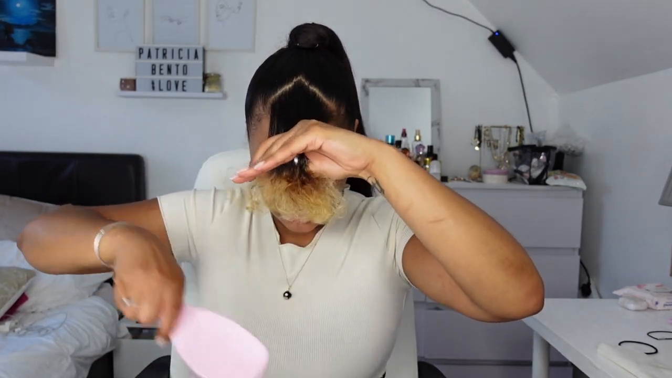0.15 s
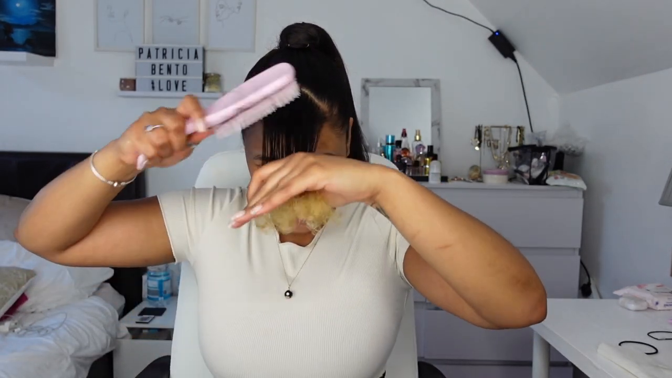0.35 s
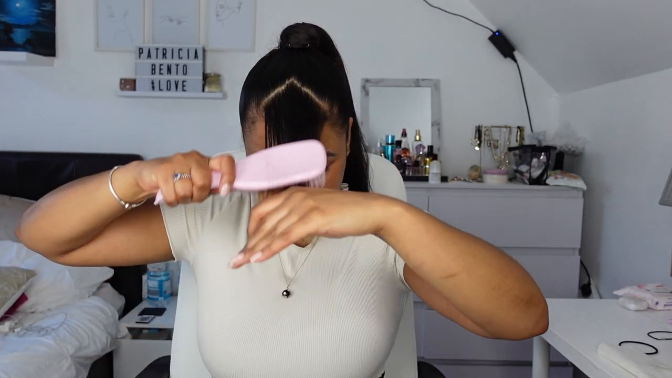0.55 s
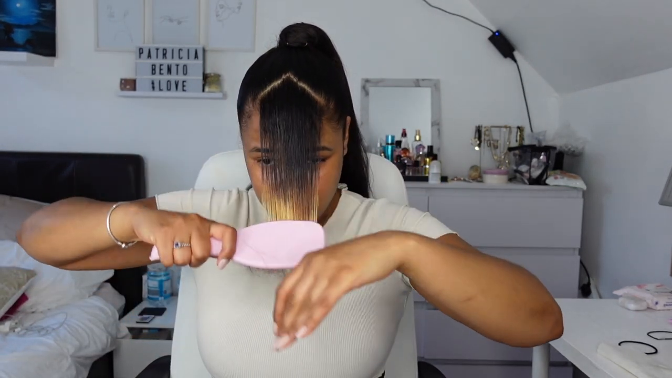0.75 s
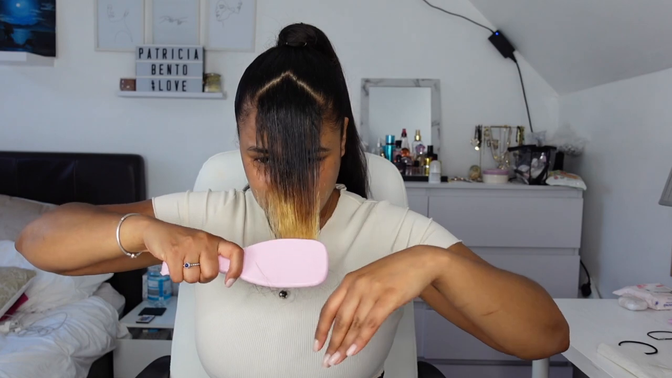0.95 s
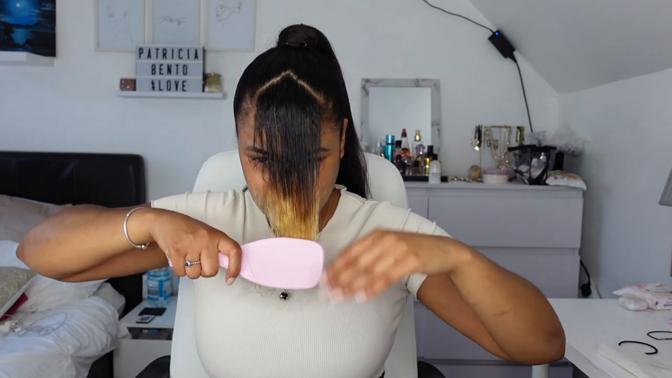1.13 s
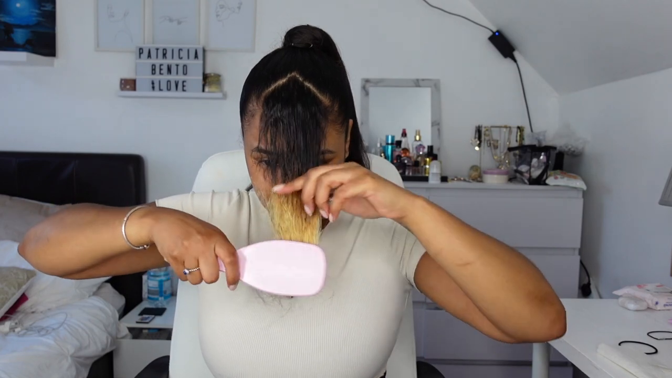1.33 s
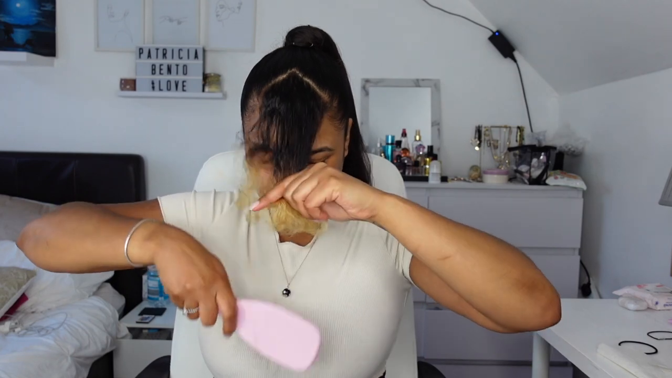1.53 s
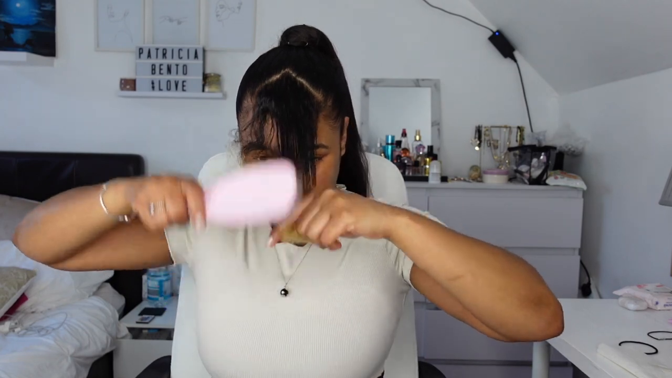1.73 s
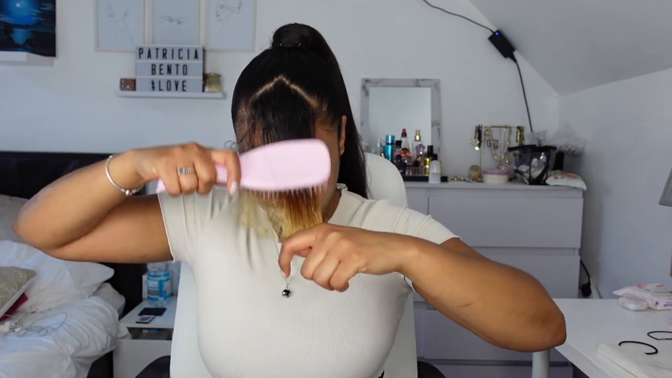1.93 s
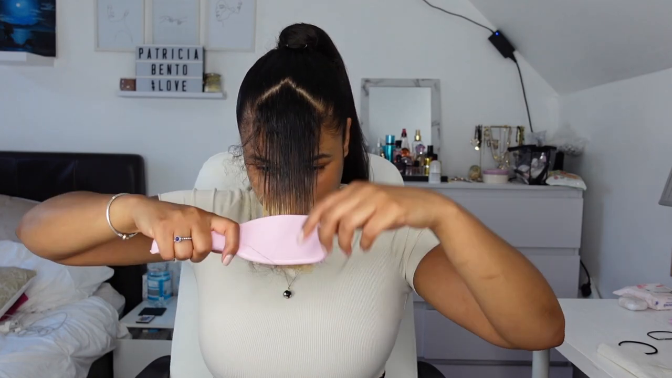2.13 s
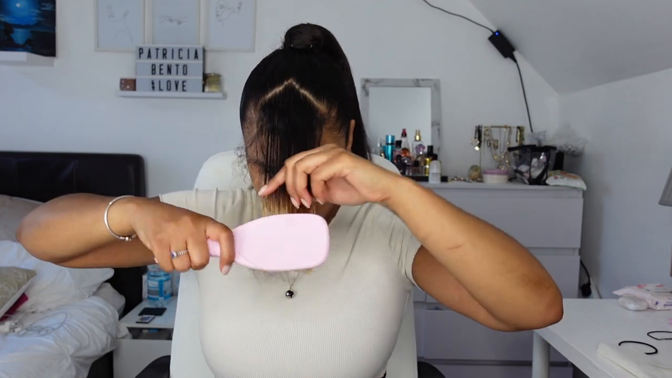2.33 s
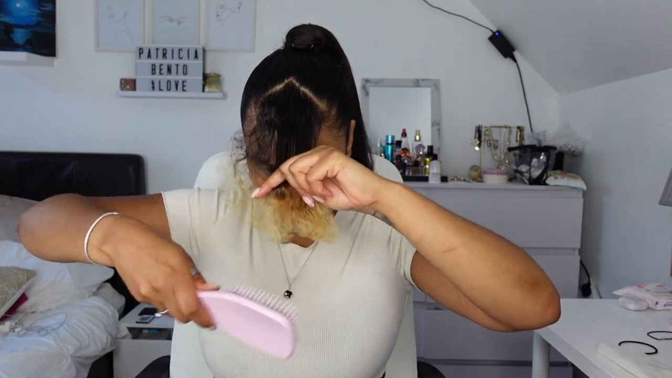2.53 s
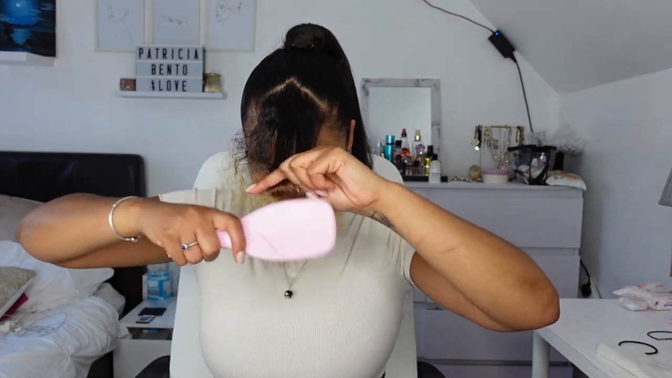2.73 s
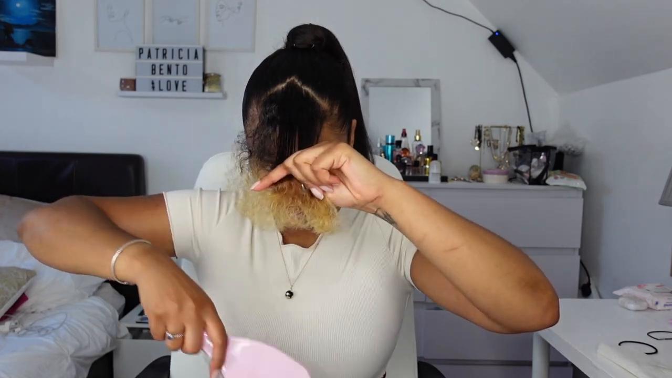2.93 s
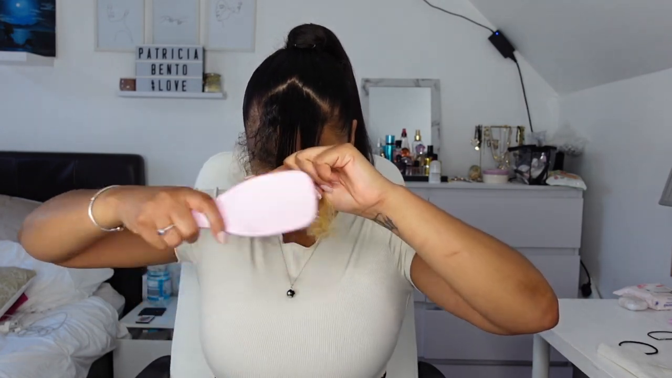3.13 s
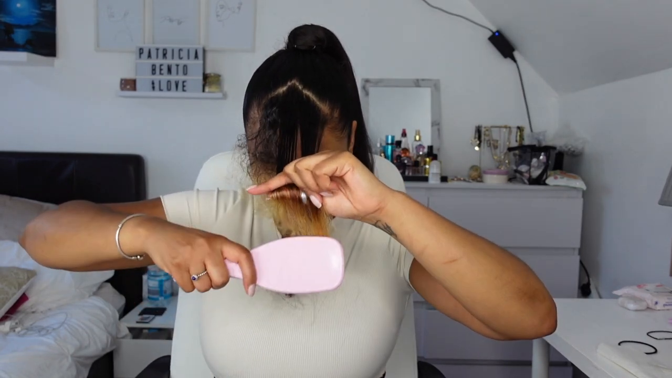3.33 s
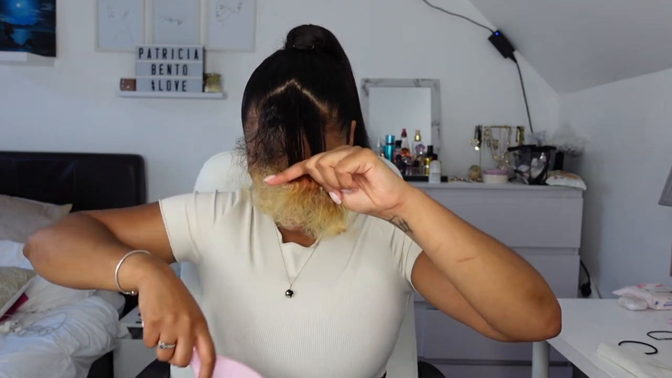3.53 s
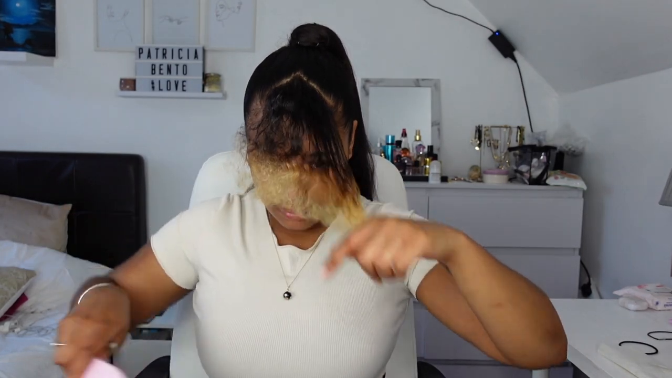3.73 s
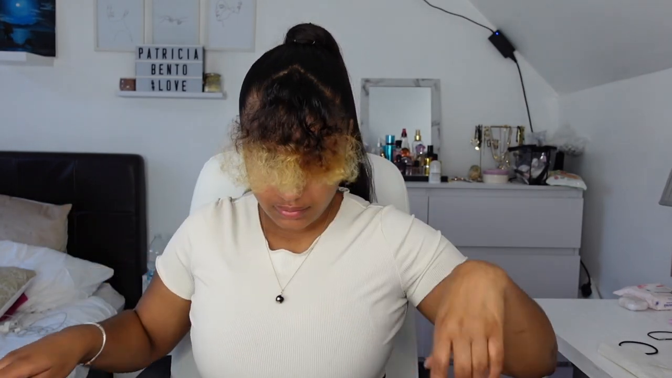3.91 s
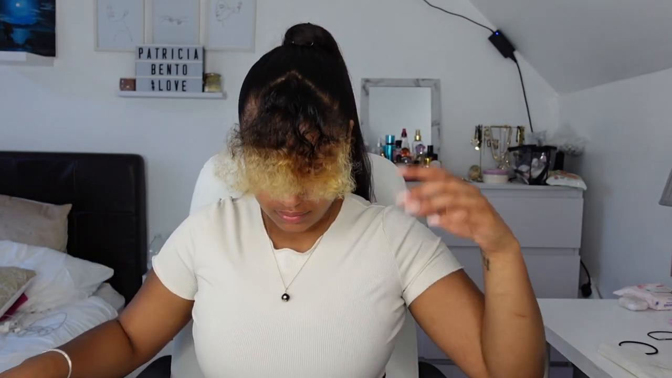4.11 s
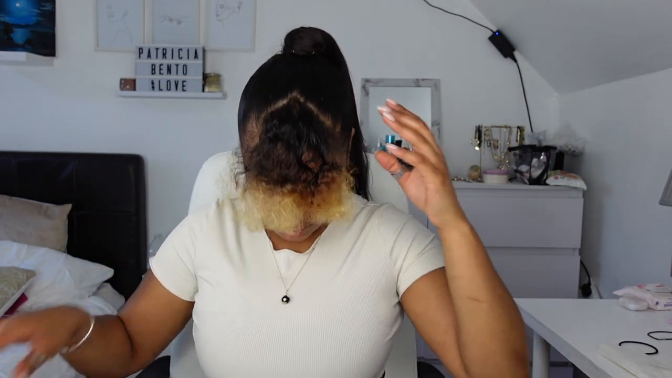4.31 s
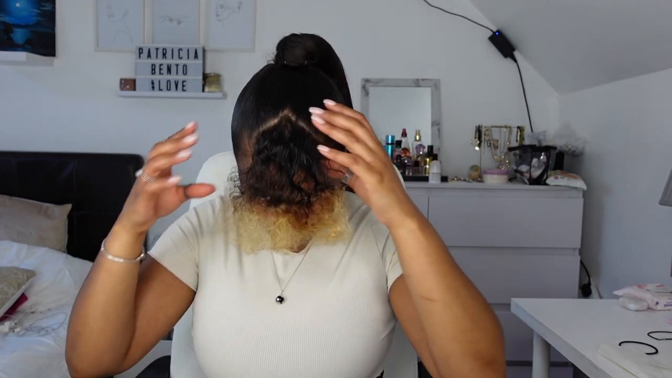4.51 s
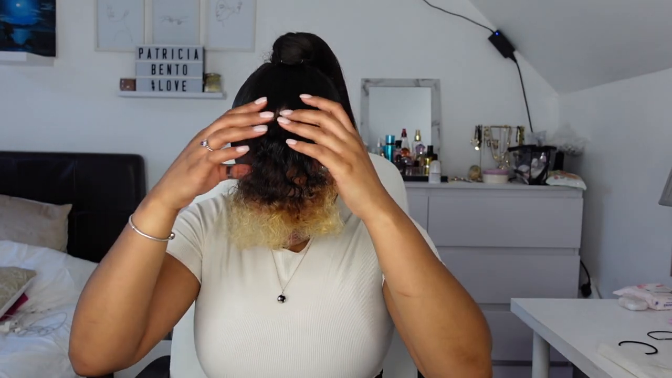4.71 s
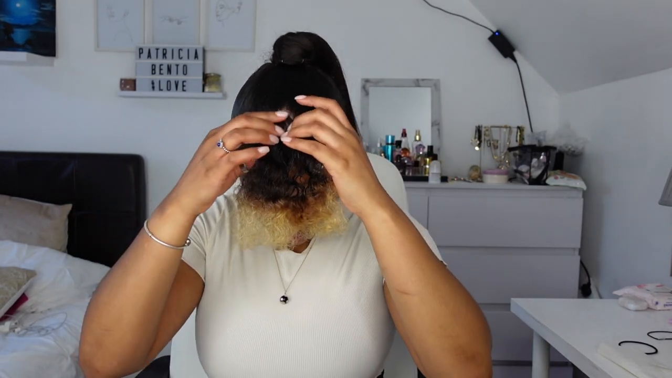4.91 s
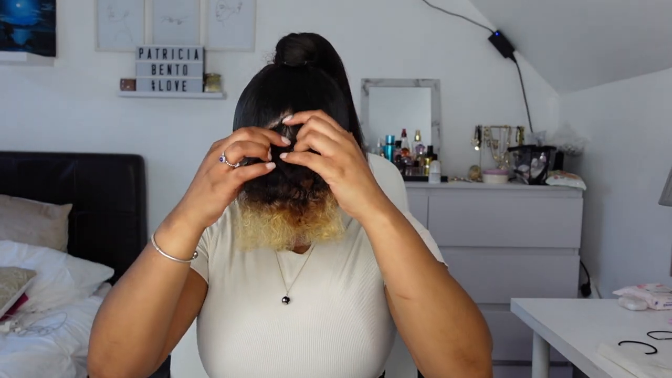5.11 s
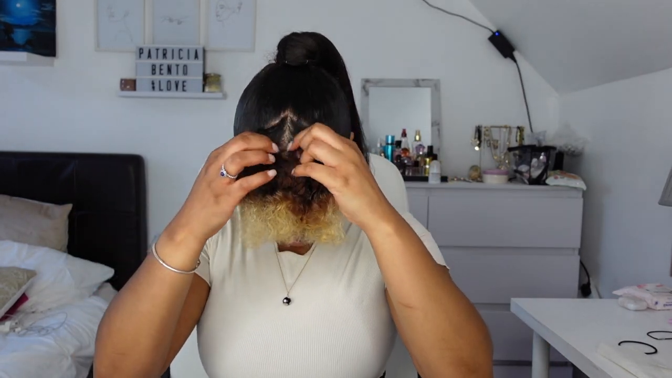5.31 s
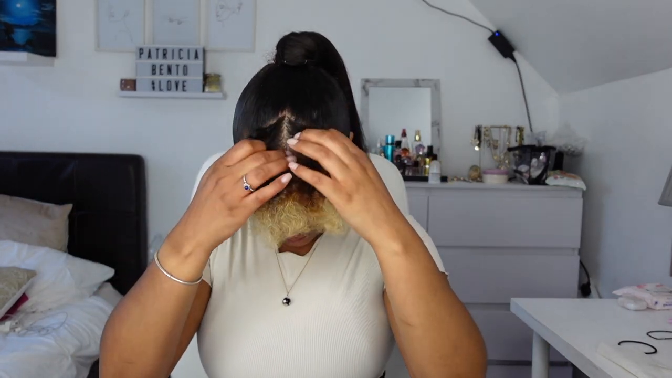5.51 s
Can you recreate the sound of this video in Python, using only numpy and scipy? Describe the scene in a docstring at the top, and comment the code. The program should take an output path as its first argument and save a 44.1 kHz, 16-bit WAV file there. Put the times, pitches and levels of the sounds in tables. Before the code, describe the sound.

Hair rustles and hisses close by as a hollow plastic brush passes through it a few times, its bristles ticking as they catch and release. Then comes the loudest sound, a quick cluster of wooden bumps and a scrape as the brush lands on a desk. A barely audible rustle of hair follows. The small room is quiet, with a soft background murmur and a few thin, distant bird whistles.

```python
"""A plastic paddle brush is pulled through hair in a quiet bedroom, then laid on a wooden desk.
Slipping strands make a soft rasp and hiss, and snagged bristles snap free and ring the hollow paddle.
Then the brush bumps, rattles and slides on the desk, making the wood ring. Small birds whistle
faintly outside, the house murmurs, a low drone comes and goes, and the room adds a short echo."""
import sys
import numpy as np
from scipy import signal
from scipy.fft import rfft, irfft
from scipy.io import wavfile
from scipy.ndimage import uniform_filter1d

SR = 44100
rng = np.random.default_rng(int(sys.argv[2]) if len(sys.argv) > 2 else 0)


def log_audio(samples):
    """Write samples as a 16-bit WAV file to the path given in sys.argv[1]."""
    # one column per channel
    frames = np.atleast_2d(samples).T
    # limit to full scale, then quantise
    limited = np.clip(frames, -1, 1)
    pcm = np.round(limited * 32767).astype(np.int16)
    wavfile.write(sys.argv[1], SR, pcm)


N = 245195

# Swells of hair rustle: brush pulls, then a faint stir of fingers in the hair.
# Each row: loudest moment, swell time and fade time in seconds, then rasp level and hiss level in dB.
HAIR_SWELLS = [(0.0, .01, 0.078, -40.5, -49), (0.15, 0.26, 0.35, -59, -75), (0.49, 0.065, 0.38, -61, -68.5),
               (0.69, 0.39, .1, -67.5, -69.5), (0.75, 0.076, 0.17, -50, -55),
               (0.86, 0.18, 0.15, -58, -61.5), (0.94, .02, 0.04, -54.5, -59), (0.97, .02, 0.18, -61, -64.5),
               (1.48, 0.13, 0.19, -67, -75), (1.93, 0.038, 0.36, -61.5, -69.5),
               (2.13, 0.63, 0.28, -63, -70), (2.475, 0.091, 0.16, -63.5, -71.5),
               (2.757, 0.011, 0.045, -63, -51), (2.8, 0.035, 0.16, -56, -61.5),
               (3.22, 0.073, 0.028, -59, -69), (3.255, 0.015, 0.014, -42, -49),
               (3.27, .02, .15, -54.5, -58), (3.447, 0.025, 0.065, -51, -56),
               (3.56, 0.19, 0.35, -69, -73.5), (4.85, 0.52, 0.45, -69, -75.5)]
# The tone of slipping hair. Each row: frequency in Hz, level in dB.
HAIR_TONE = [(180, -57), (300, -13.5), (461, -0.5), (581, -4.5), (808, 5), (1160, 0), (1620, -3),
             (1940, -7.5), (2930, -15.5), (15500, -47)]
# The notes the hollow paddle rings at. Each row: pitch in Hz, width in Hz, level in dB.
PADDLE_NOTES = [(852, 280, -1.5), (1190, 236, -18), (1660, 290, 5.5), (2146, 160, 16.5), (2620, 53, -14),
                (3107, 450, 6), (4030, 170, -15), (5570, 55, -18)]
# Bristles snapping free. Each row: start in seconds, level in dB, pitch in Hz, relative crack level in dB.
BRISTLE_SNAPS = [(0.001, -30.5, 870, -7), (0.715, -44, 865, -21), (0.734, -34.5, 1650, -29),
                 (0.744, -33.5, 980, -35), (0.756, -38.5, 1430, -26), (0.778, -36, 1580, -29),
                 (0.816, -42, 1650, -16), (0.845, -42, 2340, -27), (0.871, -42.5, 940, -27),
                 (0.935, -42.5, 1330, -25), (0.967, -44, 1560, -28), (1.914, -47.5, 785, -26),
                 (1.953, -52, 845, -23), (2.179, -49.5, 2160, -14), (2.753, -40, 1630, -6),
                 (2.763, -50, 1760, -25), (2.8, -39.5, 1730, -27), (3.214, -48.5, 870, -15),
                 (3.243, -50, 840, -11), (3.249, -29.5, 1630, -40), (3.259, -34, 1590, -29),
                 (3.296, -41, 1630, -27), (3.423, -50, 1350, -12), (3.436, -38.5, 1450, -19),
                 (3.443, -39, 1520, -29)]
# Bumps on the desk. Each row: start in seconds, level in dB, pitch in Hz, relative tick level in dB.
DESK_BUMPS = [(4.098, -16, 450, -24), (4.11, -17, 457, -22), (4.137, -17, 339, -13),
              (4.15, -9.5, 345, -21.5), (4.163, -15.5, 500, -22), (4.184, -15, 530, -18),
              (4.208, -16.5, 480, -22), (4.231, -19.5, 505, -10), (4.242, -30.5, 323, -0.5),
              (4.262, -18.5, 469, -15), (4.28, -22, 335, -11), (4.303, -11, 577, -2), (4.31, -17, 429, -17),
              (4.314, -16.5, 377, -18.5), (4.328, -24.5, 520, 6), (4.339, -17.5, 367, -8),
              (4.354, -19.5, 570, -8.5), (4.377, -19, 350, -12), (4.396, -20.5, 595, -23.5),
              (4.444, -21.5, 353, -26), (4.485, -21, 352, -13), (4.501, -28, 357, -24),
              (4.543, -27.5, 557, -19)]
# The notes the desk top rings at. Each row: pitch in Hz, width in Hz, level in dB.
DESK_NOTES = [(160.4, 26, -5), (219, 59, -14), (346.7, 28.6, -2), (460, 38.7, -6.5), (495.6, 38, -2),
              (597, 83, -8.5), (702, 40, -7.5), (870, 63, -3), (998, 100, -6), (1273, 420, -6),
              (1750, 63, -41), (2067, 82, -15), (2730, 190, -19.5), (3010, 200, -35), (3930, 240, -24.5)]
# Shoves of the brush along the desk. Each row: loudest moment, swell time and fade time in seconds,
# then low rattle, high clatter and scrape levels in dB.
DESK_SHOVES = [(4.105, 0.0056, 0.38, -42, -35, -48), (4.163, 0.045, .12, -26.5, -28.5, -40.5),
               (4.243, 0.0081, 0.13, -25, -31.5, -36.5), (4.307, 0.0066, 0.034, -16.5, -24.5, -34.5),
               (4.332, .03, 0.081, -18, -25, -30), (4.405, 0.014, 0.17, -27, -36.5, -39),
               (4.43, 0.072, 0.084, -25.5, -47.5, -34.5), (4.49, 0.12, 0.062, -28.5, -49, -49),
               (4.55, 0.043, 0.053, -41.5, -44.5, -55), (4.6, 0.16, 0.085, -68, -46, -53.5)]
# The tone of bristles scraping wood. Each row: frequency in Hz, level in dB.
SCRAPE_TONE = [(1290, -25), (2200, -5), (3200, -1), (3360, -9), (3800, 2.5), (4480, -4.5), (8130, -11.5),
               (9730, -20), (13900, -32), (15500, -39)]
# Distant bird calls. Each row: start and length in seconds, first and last pitch in Hz, level in dB.
BIRD_CALLS = [(1.065, .12, 4210, 4360, -70.5), (1.198, 0.071, 4450, 4400, -78),
              (1.63, 0.09, 3490, 3540, -80), (1.635, .07, 7000, 7000, -85), (4.87, .03, 5500, 5530, -84),
              (4.983, 0.037, 6120, 6900, -88), (4.997, 0.032, 5550, 5470, -79),
              (5.09, 0.035, 8150, 8150, -76), (5.107, 0.049, 6000, 6800, -79),
              (5.125, .035, 5270, 5550, -76), (5.2, 0.045, 7900, 7800, -77), (5.226, .05, 4750, 4540, -76),
              (5.238, 0.046, 6000, 6800, -71), (5.366, 0.06, 5860, 6780, -72.5),
              (5.38, 0.032, 5200, 5250, -81.5)]
# The tone of the house murmur. Each row: frequency in Hz, level in dB.
HOUSE_TONE = [(18, -65), (30, -41), (182, -6.5), (379, -4), (480, 1.5), (657, -0.5), (748, -7), (853, -9.5),
              (1560, -13.5), (1730, -7.5), (1920, -11.5), (2190, -6.5), (2840, -19), (4430, -22.5),
              (15500, -27.5)]
# How wide the murmur sounds. Each row: frequency in Hz, level of the sides against the middle in dB.
HOUSE_WIDTH = [(60, 1.5), (110, -13.5), (200, 1.5), (380, -4), (700, 2), (1290, 6.5), (2380, -1.5),
               (4400, 3), (8120, -0.5), (15000, -10)]

RUSTLE_RASP_DB, RUSTLE_HISS_DB = -70.5, -84  # hands stir the hair all the time
UPPER_NOTES_DB, UPPER_DB_PER_OCTAVE = -4, 4  # higher snaps ring the paddle's upper notes more
DRONE_FROM_S, DRONE_TO_S, DRONE_SWELL_S, DRONE_FADE_S = 3.6, 3.95, 0.15, 0.091
DRONE_HZ, DRONE_WIDTH_HZ, DRONE_DB, HOUSE_DB = 410, 110, -61.5, -62
ECHO_LOW_S, ECHO_HIGH_S = 0.22, 0.23  # time for the lows and the highs to fade by 60 dB
ECHO_DB, ECHO_SIDE_DB = -8.5, -1


def hair_rustle():
    """Strands slip over bristles and fingers in tiny clicks: a rasp that rings the paddle, and hiss."""
    slips = grains(3500, spread_db=3.0)
    sound = unit(colour(slips, HAIR_TONE)) + 0.074 * unit(ring(slips, PADDLE_NOTES))
    rasp = signal.sosfiltfilt(butter(2, 3200), sound)
    hiss = sound - rasp
    rasp = signal.sosfilt(butter(2, 450, "high"), rasp)  # the light paddle has no bass
    grip = amp(2.27 * wander(40))
    rasp_gain, hiss_gain = np.hypot(surges(HAIR_SWELLS), amp([[RUSTLE_RASP_DB], [RUSTLE_HISS_DB]]))
    return grip * (rasp_gain * unit(rasp) + hiss_gain * unit(hiss))


def bristle_snaps():
    """Each freed bristle flicks the paddle: a short tone, a hollow ring and a bright crack."""
    out, t = np.zeros((2, N)), np.arange(2048) / SR
    for start, db, hz, crack_db in BRISTLE_SNAPS:
        pan_db = 0.5 + rng.standard_normal()  # how much louder on the left
        tone = np.sin(2 * np.pi * hz * t) * np.sqrt(t) * np.exp(-t * hz / 2.57)
        kick = rng.standard_normal(len(t)) * t * np.exp(-t / 0.0002)
        body = ring(kick, favour(PADDLE_NOTES[:4], hz, db_per_octave=13))
        knock = peak(peak(tone) + 0.69 * peak(body))
        upper_db = UPPER_NOTES_DB + UPPER_DB_PER_OCTAVE * np.log2(hz / PADDLE_NOTES[2][0])
        upper = amp(upper_db) * peak(ring(kick, PADDLE_NOTES[4:]))
        noise = signal.sosfilt(butter(2, [4000, 10000], "band"), rng.standard_normal(len(t)))
        crack = amp(crack_db) * peak(noise * np.exp(-t / 0.0016))
        add(out, start, amp(db) * (knock + upper + crack) * amp([[pan_db / 2], [-pan_db / 2]]))
    return out


def desk_bumps():
    """Each bump of the brush rings the desk top with a thud and a hard tick."""
    out, t = np.zeros(N), np.arange(8192) / SR
    for start, db, hz, tick_db in DESK_BUMPS:
        push = signal.windows.hann(int(SR * .6 / hz)) * rng.choice([-1, 1])  # lower-pitched bumps push for longer
        thud = ring(np.pad(push, (0, len(t) - len(push))), favour(DESK_NOTES, hz, db_per_octave=5))
        tick = ring(rng.standard_normal(len(t)) * np.exp(-t / 0.00093), DESK_NOTES[7:])
        add(out, start, amp(db) * (peak(thud) + amp(tick_db) * peak(tick)))
    return out


def desk_slide():
    """The sliding brush rattles the wood with tiny taps while its bristles scrape along."""
    taps = uniform_filter1d(grains(1200, spread_db=1.5), size=5)  # smoothing softens each tap
    rattle = unit(ring(taps, favour(DESK_NOTES[:7], hz=350, db_per_octave=4.5)))
    clatter = unit(ring(taps, DESK_NOTES[7:]))
    scrape = unit(colour(grains(7000, spread_db=0.5), SCRAPE_TONE)) * amp(2.5 * wander(50))
    return np.sum(surges(DESK_SHOVES) * [rattle, clatter, scrape], axis=0)


def birds():
    """Small birds give thin, warbling whistles that glide quickly to their last pitch."""
    out = np.zeros(N)
    for start, length, first_hz, last_hz, db in BIRD_CALLS:
        t = np.arange(int(length * SR)) / SR
        glide = last_hz + (first_hz - last_hz) * np.exp(-t / 0.0072)
        warble = 100 * wander(240)[:len(t)]
        whistle = np.sin(2 * np.pi * np.cumsum(glide + warble) / SR)
        add(out, start, amp(db) * whistle * np.sin(np.pi * t / length) ** 0.12)
    return out


def house_murmur():
    """House and street make a soft noise that swells slowly; its low part also wavers on its own."""
    middle = unit(colour(rng.standard_normal(N), HOUSE_TONE))
    side = colour(unit(colour(rng.standard_normal(N), HOUSE_TONE)), HOUSE_WIDTH)
    both = stereo(middle, side)
    low = signal.sosfiltfilt(butter(1, 1200), both)
    wavering = both - low + low * amp(0.5 * wander(11))
    return amp(HOUSE_DB) * unit(wavering * amp(0.62 * wander(1.4)))


def drone():
    """A low drone, made of a narrow band of noise, swells, holds and fades."""
    t = np.arange(N) / SR
    before, after = (DRONE_FROM_S - t) / DRONE_SWELL_S, (t - DRONE_TO_S) / DRONE_FADE_S
    drop_db = 20 * np.maximum(0, np.maximum(before, after))
    hum = unit(ring(rng.standard_normal(N), [(DRONE_HZ, DRONE_WIDTH_HZ, 0)]))
    return hum * amp(DRONE_DB - drop_db)


def room_echo(x):
    """The bedroom sends back many quick echoes, a little different on the left and right."""
    t = np.arange(SR // 2) / SR
    echoes = rng.standard_normal((2, len(t))) * (t > .004)
    low = signal.sosfilt(butter(1, 2000), echoes)
    tail = low * amp(-60 * t / ECHO_LOW_S) + (echoes - low) * amp(-60 * t / ECHO_HIGH_S)
    tail /= np.sqrt(np.sum(tail ** 2) / 2)
    middle, side = signal.fftconvolve(x[None], tail, axes=1)[:, :N]
    side = signal.sosfilt(butter(2, [700, 9500], "band"), side)
    return amp(ECHO_DB) * stereo(middle, amp(ECHO_SIDE_DB) * side)


def amp(db):
    """Turn decibels into a number to multiply by."""
    return 10 ** (np.asarray(db, float) / 20)


def unit(x):
    """Scale to an average power of 1."""
    return x / np.sqrt(np.mean(x ** 2))


def peak(x):
    """Scale so the biggest sample has size 1."""
    return x / np.max(np.abs(x))


def add(track, start, sound):
    """Mix a sound into the track at a start time in seconds."""
    i = int(start * SR)
    track[..., i:i + sound.shape[-1]] += sound[..., :N - i]


def stereo(middle, side):
    """Add the side sound on the left and subtract it on the right."""
    return middle + side * np.array([[1], [-1]])


def butter(order, hz, keep="low"):
    """Make a filter that keeps the lows, the highs or a band."""
    return signal.butter(order, hz, keep, fs=SR, output="sos")


def colour(x, tone):
    """Turn each frequency up or down as a tone table says."""
    hz, db = np.transpose(tone)
    bins = np.maximum(np.arange(N // 2 + 1) * SR / N, 1)
    return irfft(rfft(x) * amp(np.interp(np.log(bins), np.log(hz), db)), N)


def ring(x, notes):
    """Let x ring an object's notes, every second one flipped; narrow notes ring longer."""
    return sum((-1) ** k * amp(db) * signal.lfilter(*signal.iirpeak(hz, hz / width, SR), x)
               for k, (hz, width, db) in enumerate(notes))


def favour(notes, hz, db_per_octave):
    """A hit favours the notes near its own pitch, so turn the others down."""
    return [(f, width, db - db_per_octave * abs(np.log2(f / hz))) for f, width, db in notes]


def wander(rate):
    """A smooth random curve that heads for a new value `rate` times a second."""
    hold = int(SR / rate)
    steps = np.repeat(rng.standard_normal(N // hold + 1), hold)
    return uniform_filter1d(uniform_filter1d(steps, hold), hold)[:N]


def grains(rate, spread_db):
    """About `rate` random clicks a second, mostly small, a few larger."""
    hit = rng.random(N) < rate / SR
    size = np.minimum(rng.exponential(size=N), 3)
    return unit(hit * rng.choice([-1, 1], N) * amp(spread_db * size))


def surge(loudest_s, swell_s, fade_s):
    """A volume curve that climbs 20 dB in swell_s, reaches 1, then drops 20 dB every fade_s."""
    t = np.arange(N) / SR - loudest_s
    return amp(-20 * np.where(t < 0, -t / swell_s, t / fade_s))


def surges(rows):
    """One volume curve for each layer, adding up the power of every row's surge."""
    return np.sqrt(sum((amp(levels)[:, None] * surge(loudest_s, swell_s, fade_s)) ** 2
                       for loudest_s, swell_s, fade_s, *levels in rows))


def scene():
    """Mix the nearby sounds and birds with their echo, over the murmur and drone."""
    near = bristle_snaps() + hair_rustle() + desk_bumps() + desk_slide()
    near = signal.sosfilt(butter(3, 125, "high"), near)  # small objects give off no deep bass
    calls = birds()
    echo = room_echo(near.mean(axis=0) + 2.4 * calls)  # distant birds get more echo
    return near + calls + echo + house_murmur() + drone()


def record(dry):
    """Cut away the very highest treble."""
    top_hz = 15700
    return signal.sosfilt(signal.ellip(10, .2, 60, top_hz, fs=SR, output="sos"), dry)


dry = scene()
out = record(dry)
log_audio(out)
```